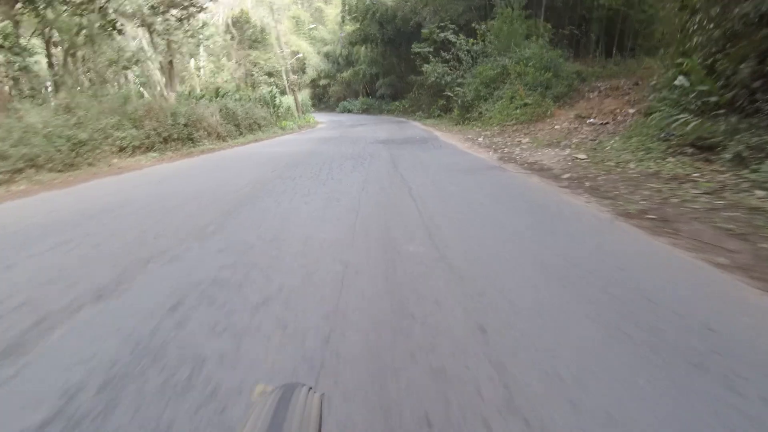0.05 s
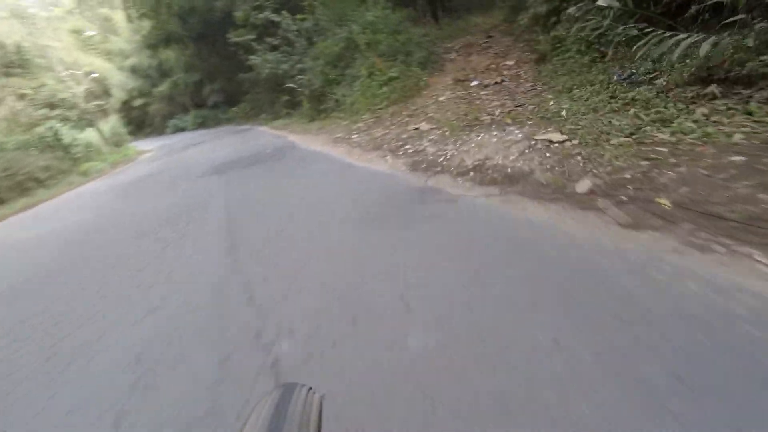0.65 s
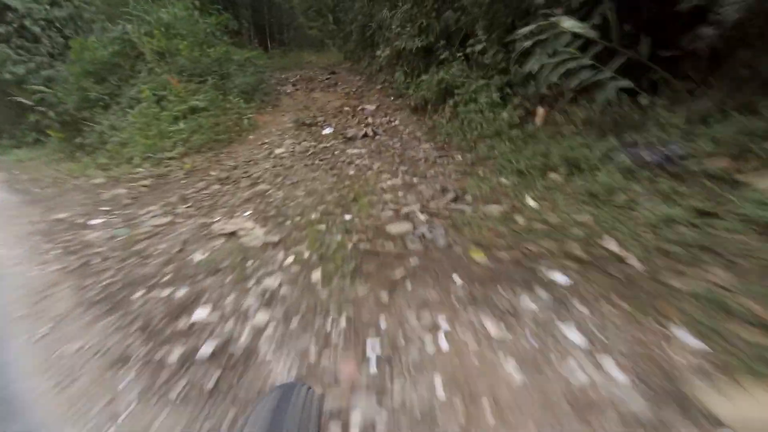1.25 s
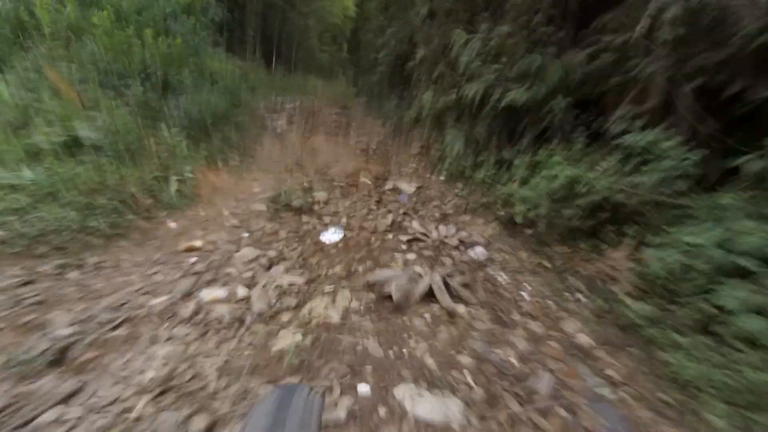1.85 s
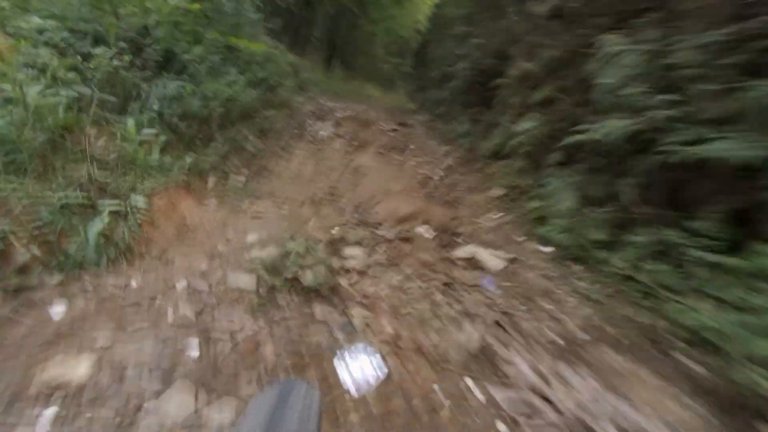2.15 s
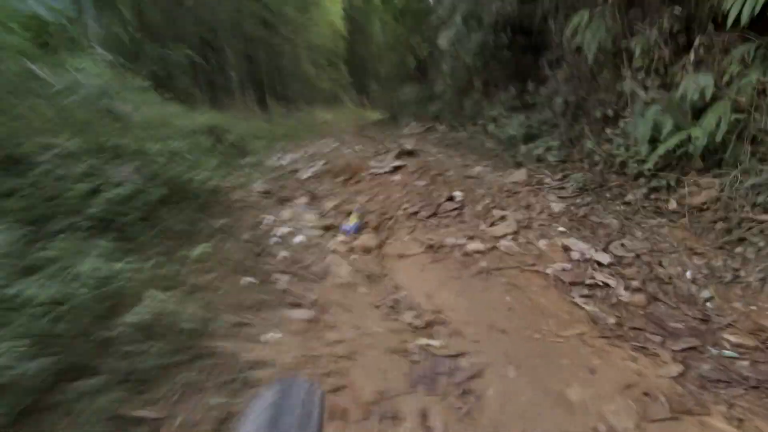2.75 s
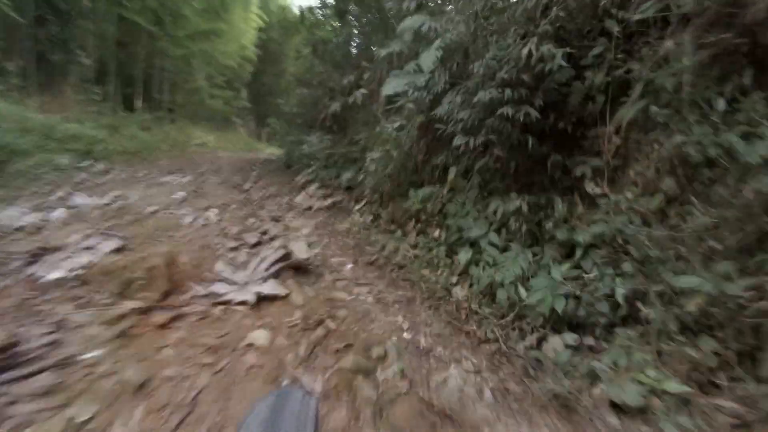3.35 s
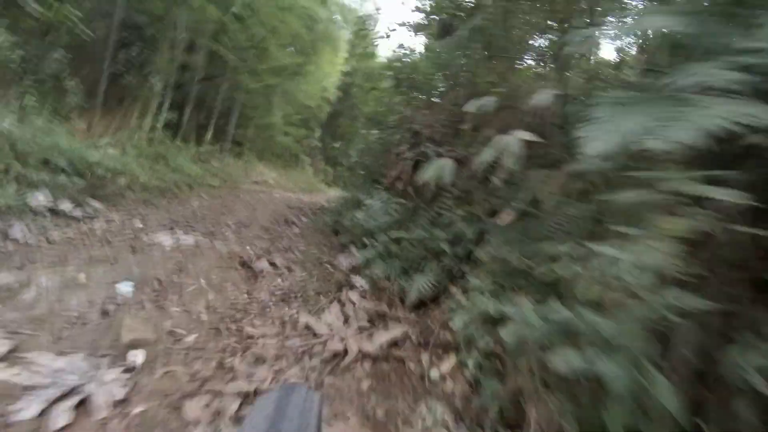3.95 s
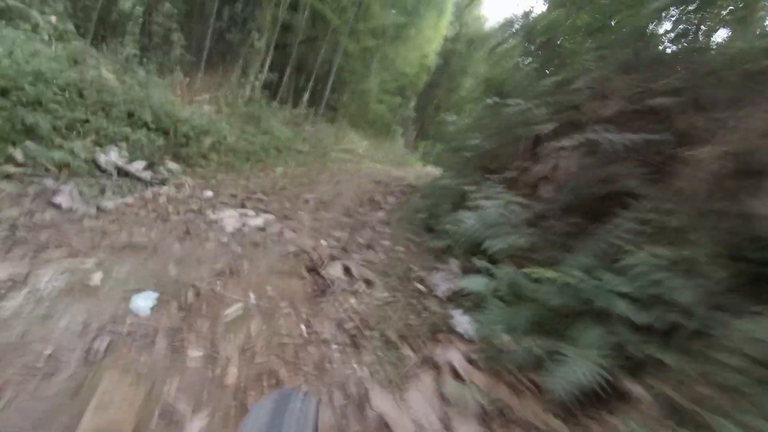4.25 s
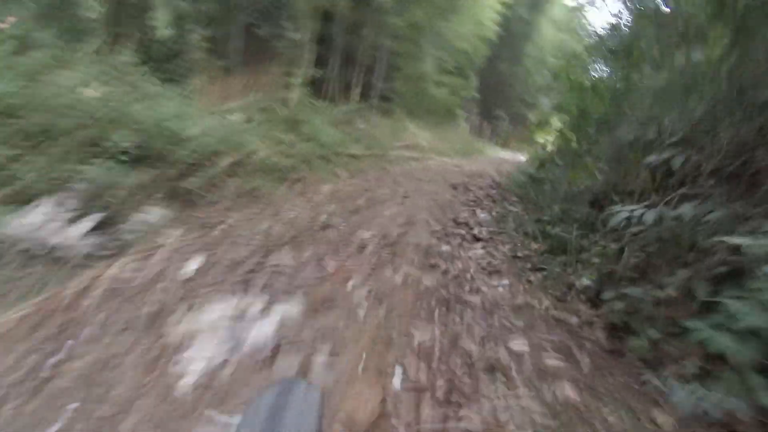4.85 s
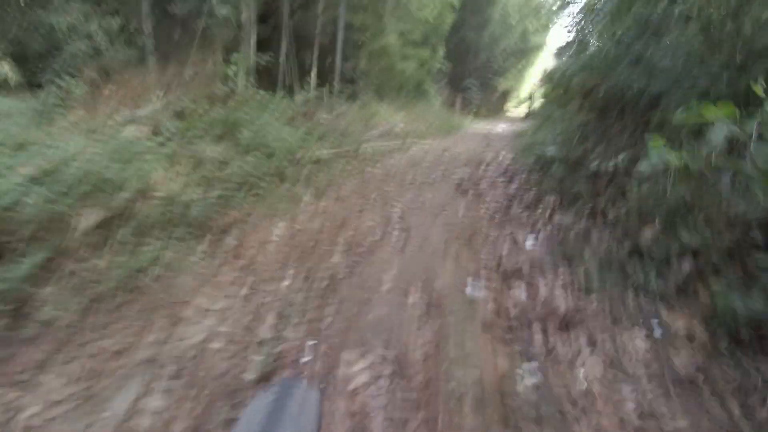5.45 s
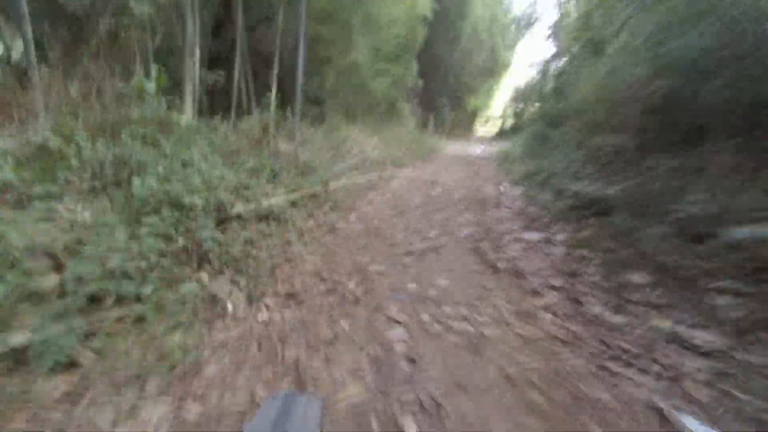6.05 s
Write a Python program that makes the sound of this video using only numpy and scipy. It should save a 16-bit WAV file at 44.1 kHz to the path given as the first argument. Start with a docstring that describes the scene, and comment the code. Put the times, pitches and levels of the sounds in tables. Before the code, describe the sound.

Close, dry rumble of a bicycle braking briefly, then rattling and knocking over rough ground with metallic clinks and low thuds.

```python
"""Mountain bike, from tarmac to stony trail.

The microphone rides in a camera fixed to the frame, so everything is close and dry. The bike brakes on
tarmac, then turns onto stones and leaves. The tyres shake the frame, stones knock the camera housing,
chain and cables clack against the tubes, brake pads and dry leaves hiss. The hardest jolts overload
the microphone, and now and then the running noise cuts out for an instant."""
import sys
import numpy as np
from scipy import signal
from scipy.fft import rfft, irfft, next_fast_len
from scipy.io import wavfile
from scipy.ndimage import uniform_filter1d

SR = 44100
rng = np.random.default_rng(int(sys.argv[2]) if len(sys.argv) > 2 else 0)


def put_to_file(sound):
    """Save the sound as 16-bit audio at rate SR, in the file named by the first command-line argument."""
    columns = np.atleast_2d(sound).T  # one column per channel
    safe = np.clip(columns, -1, 1)
    whole_steps = np.round(safe * 32767)
    wavfile.write(sys.argv[1], SR, whole_steps.astype(np.int16))


N = 272979
T = np.arange(N) / SR
DETUNE = 0.048  # each contact lands elsewhere on the metal and shifts its ring by up to about this share


def undb(db):
    """Decibels to gain."""
    return 10 ** (np.asarray(db) / 20)


def unit(x):
    """Scale to rms 1."""
    return x / np.sqrt(np.mean(x ** 2) + 1e-18)


def peak_at(sound, db, size):
    """Scale a hit so that its loudest stretch of `size` samples has the given amplitude."""
    return sound * undb(db) / np.sqrt(2 * uniform_filter1d(sound ** 2, size).max())


def add(out, s, sound):
    """Mix a sound in at time s."""
    i = int(np.clip(s * SR, 0, N - 1))
    out[i:i + len(sound)] += sound[:N - i]


def curve(table):
    """Rows (time [s], value) joined by straight lines."""
    return np.interp(T, *np.transpose(table))


def walk(per_s):
    """Random levels held 1 / per_s seconds and smoothed twice."""
    hold = max(int(SR / per_s), 1)
    steps = rng.standard_normal(N)[np.arange(N) // hold]
    return uniform_filter1d(uniform_filter1d(steps, hold), hold)


def grains(per_s, spread_db):
    """Random impulses of very unequal size."""
    occurs = rng.random(N) < per_s / SR
    size = np.minimum(rng.exponential(size=N), 3)
    return occurs * rng.choice([-1, 1], N) * undb(spread_db * size)


def colour(x, spectrum):
    """Filter by points (frequency [Hz], gain [dB]), rolling off below the first."""
    hz, db = np.transpose(spectrum)
    size = next_fast_len(len(x))
    f = np.maximum(np.arange(size // 2 + 1) * SR / size, 1)
    gain = undb(np.interp(np.log(f), np.log(hz), db)) / np.sqrt(1 + (hz[0] / f) ** 6)
    return irfft(rfft(x, size) * gain, size)[:len(x)]


def ringing(modes, size):
    """One row per mode: its damped swing after a tap; neighbours swing in opposite senses."""
    hz, width, db = np.transpose(modes)[:, :, None]
    t = np.arange(size) / SR
    sense = (-1) ** np.arange(len(hz))[:, None]
    return sense * undb(db) * width * np.exp(-np.pi * width * t) * np.sin(2 * np.pi * hz * t)


def around(modes, hz, octaves):
    """Weights that favour the modes near one frequency."""
    return np.exp(-(np.log2(np.transpose(modes)[0] / hz) / octaves) ** 2 / 2)


def shake(force, modes):
    """A body's answer to a running force, at rms 1."""
    return unit(signal.fftconvolve(force, ringing(modes, size=16384).sum(0))[:N])


def blow(modes, weights, contact_s, chatter, size):
    """A push followed by dying chatter of the contact rings the weighted modes."""
    t = np.arange(size) / SR
    contact = np.exp(-t / contact_s) * (1 - np.exp(-2 * t / contact_s)) / np.sqrt(contact_s * SR)
    force = chatter * rng.standard_normal(size) * contact
    force[0] += 1
    return signal.fftconvolve(force, weights @ ringing(modes, size))[:size]


def even(swing):
    """Stiff springs hold a swing near its usual size."""
    return swing / np.sqrt(uniform_filter1d(swing ** 2, size=4000) + 0.68)


# Modes of the fork, of the frame and mount under the microphone, and of the housing right around it:
# (frequency [Hz], width [Hz], gain [dB])
FORK_MODES = [(49, 9, 0)]
FRAME_MODES = [(103.36, 7.7, 8.5), (173.5, 13, -3.5), (186, 19.2, -4), (248.4, 22.8, 2), (334, 23, -20)]
HOUSING_MODES = [(344, 410, -15), (471.8, 45.7, -1), (517.4, 23.2, 1), (627, 62, 2.5), (772, 187, -3),
                 (926, 129, 1.5), (1086, 236, -4.5), (1176.7, 165, -5.5), (1827, 1570, -24)]
# Shaking by the ground: (time [s], relative frame rumble [dB], relative housing drone [dB])
SHAKING = [(0.04, -24, -18), (0.35, -27, -16), (1.36, -25.5, -18), (1.6, -29.5, -22.5), (2.03, -28, -17),
           (2.3, -27.5, -24.5), (2.64, -32, -15), (2.8, -40.5, -24), (3.29, -36, -29.5), (3.76, -29, -17.5),
           (4.27, -36.5, -25.5), (4.49, -28.5, -30), (4.66, -30.5, -26.5), (5.08, -34, -22.5),
           (5.37, -35.5, -26.5), (5.59, -31, -20), (5.73, -29.5, -24), (6.19, -25, -24)]


def tyres(rumble_db, drone_db, loose):
    """Tread and grit shake frame and housing; loose ground works the fork and coarsens the drone."""
    bounce = (0.21 + 0.59 * loose) * even(shake(rng.standard_normal(N), FORK_MODES))
    rumble = even(shake(rng.standard_normal(N), FRAME_MODES)) + bounce
    tread = colour(rng.standard_normal(N), [(300, 3.5), (650, 8), (800, -8.5), (1280, 1.5), (1600, -28)])
    grit = grains(per_s=260, spread_db=7.5)
    drone = np.sqrt(1 - loose) * shake(tread, HOUSING_MODES)
    drone += np.sqrt(loose) * shake(grit, HOUSING_MODES)
    return rumble * undb(rumble_db + 10.5) + drone * undb(drone_db - 2.03)


# Modes of the tubes and fittings beside the microphone: (frequency [Hz], width [Hz], gain [dB])
FITTING_MODES = [(1050, 340, -4.5), (1933, 87, -8.5), (2853, 470, -2.5), (3415, 720, -1), (3836, 210, 0.5),
                 (4560, 480, -6.5), (4970, 850, -6.5), (6070, 140, -13.5)]


def ground_crunch(drone_db, loose):
    """Gravel, twigs and leaves crunch in clusters and the tyres crackle, harder as the bike shakes."""
    decay = np.exp(-np.arange(512) / SR / 0.00074)
    clusters = undb(np.clip(walk(per_s=22.33), -2, 1))

    def scrapes(per_s):
        """Short bursts of noise at random moments."""
        taps = np.abs(grains(per_s, spread_db=9)) * clusters
        return signal.fftconvolve(taps, decay)[:N] * rng.standard_normal(N)

    gravel = scrapes(per_s=140 * loose)
    stones = undb(-5) * shake(gravel, HOUSING_MODES) + undb(-17) * shake(gravel, FITTING_MODES)
    leaves = undb(-21.5) * unit(colour(scrapes(per_s=45 * loose), [(4000, 1), (15000, 0)]))
    crackle_spectrum = [(1250, 4), (2400, -1), (3700, 21), (6300, -26), (8000, -10)]
    crackle = unit(colour(scrapes(per_s=130 * loose), crackle_spectrum))
    crackle_db = drone_db - drone_db.mean() - 39.5
    return (stones + leaves) * loose * undb(drone_db) + crackle * loose ** 2 * undb(crackle_db)


# Rubbing of the pads, down at the hub: (frequency [Hz], gain [dB])
PAD_SPECTRUM = [(1300, -2), (2600, -4), (4200, -11), (6000, -15), (8000, -11.5), (10000, -9), (15000, -9.5)]
# Modes of the brake disc: (frequency [Hz], width [Hz], gain [dB])
DISC_MODES = [(2970, 200, 8), (3830, 250, 3), (4570, 130, 3), (5480, 140, -8), (7020, 250, -10),
              (9120, 300, -4), (9680, 170, -2), (10300, 500, -9), (11050, 500, -6), (12400, 300, -3),
              (13800, 600, -7)]
# Pressure on the brake, heard as the hiss of its pads: (time [s], relative level [dB])
BRAKE_LEVELS = [(0.05, -52), (0.4, -46), (0.6, -37), (0.93, -42.5), (1.35, -37), (1.5, -49), (2.4, -48),
                (2.8, -68.5), (5.78, -59), (5.9, -54), (6.19, -61)]


def brake():
    """The pads graze in pulses, then grip and ring the disc; on the trail they keep dragging lightly."""
    f = np.arange(N // 2 + 1) * SR / N
    resonance = sum(undb(db) / (1 + ((f - hz) / (0.72 * width)) ** 2) for hz, width, db in DISC_MODES)
    rubbing = colour(rng.standard_normal(N), PAD_SPECTRUM)
    disc = irfft(rfft(rng.standard_normal(N)) * resonance, N)
    pads = unit(rubbing + 1.2 * disc)
    pads *= undb(1.3 * walk(per_s=69.85))  # the pads catch unevenly
    grazing = np.clip((0.7 - T) / 0.5, 0, 1)
    pads *= undb(4.7 * grazing * np.sin(2 * np.pi * 29 * T))
    # A light touch rings only the lowest modes.
    singing = grazing * shake(rng.standard_normal(N), DISC_MODES[:3]) * undb(-43.5)
    return singing + pads * undb(curve(BRAKE_LEVELS) + 6)


def clack(db, crack_db, tap_db):
    """Chain or cable rings the fittings and taps the housing; a hard contact adds a broad crack."""
    t = np.arange(2048) / SR
    weights = undb(2 * rng.standard_normal(len(FITTING_MODES)))
    tubes = np.array(FITTING_MODES)
    tubes[:, 0] *= 1 + DETUNE * rng.uniform(-1.11, 1, len(tubes))
    ring = blow(tubes, weights, contact_s=0.0017, chatter=1.5, size=len(t)) * (1 - np.exp(-t / 0.0012))
    tap_weights = around(HOUSING_MODES, hz=1486, octaves=0.16)
    tap = blow(HOUSING_MODES, tap_weights, contact_s=0.0011, chatter=2.66, size=len(t))
    crack = colour(rng.standard_normal(len(t)), [(4000, 8.3), (12000, 7.7), (15500, 2.5)])
    crack *= (1 - np.exp(-t / 0.0001)) * np.exp(-t / 0.0028)
    return (peak_at(ring, db - 1, size=60)
            + peak_at(tap, db + tap_db + 0.5, size=120)
            + peak_at(crack, db + crack_db, size=120))


# Chain and cables hitting the frame, within arm's reach of the microphone:
# (time [s], level [dB], sharp crack offset [dB], hollow tap offset [dB])
FRAME_CLACKS = [(0.1984, -12, -19, 3.5), (0.3691, -15, -32, 4), (0.606, -17.5, -30, 8.5),
                (0.7631, -12.5, -29, 4), (0.7852, -13.5, -25, -1), (1.2475, -14, -30, 2.5),
                (1.4218, -6, -6, -34), (1.4349, 3.5, -11, -33), (1.587, -11, -8, -12),
                (1.609, -9.5, -8, -6), (1.6398, -18.5, 4, 2), (1.8006, -5, -14, -2.5),
                (1.8177, -4, -1, -17), (1.841, -2, -22, -9), (2.282, -19, -25, 8.5), (2.3136, -2, -11, 0.5),
                (2.732, -9.5, -33, -8), (3.135, -10.5, -5, 0), (3.253, -10.5, -11.5, -3.5),
                (3.497, -10, -25, -14), (3.5178, -2.5, -13.5, -4), (3.5819, -13, -2.5, 1.5),
                (3.7622, -4.5, -3, -20), (3.818, -5.5, -7, -23), (3.858, -11, -10, -3),
                (3.8771, -10.5, -9, -2), (3.907, -13, -1, -10), (3.9516, -13, -2, -26),
                (4.043, -14.5, -12, -9), (4.076, -21.5, -35, 11), (4.2048, -7, -29, 4),
                (4.681, -19.5, -16, 8.5), (4.9855, -12, -1.5, -8), (5.3192, -8.5, -1.5, -33),
                (5.409, -0.5, -9, -34), (5.578, -8, -7, -2), (5.586, -7, -5, -12),
                (5.7043, -13.5, -0.5, -16), (6.137, -14, -8.5, -34)]


def clacks():
    """The chain and cables swing against the tubes on their own, and bounce once."""
    out = np.zeros(N)
    for s, db, crack_db, tap_db in FRAME_CLACKS:
        add(out, s, clack(db, crack_db, tap_db))
        bounce_s = 0.014 * (0.5 + rng.random())
        add(out, s + bounce_s, clack(db - 14.5, crack_db, tap_db))
    return out


# A cable pinging on a nearby tube, and the chain chinking on its sprockets further off:
# (time [s], relative level [dB])
CABLE_PINGS = [(0.447, -20), (0.5084, -14.5), (0.526, -21), (0.5821, -16), (0.632, -15.5), (0.6684, -11.5),
               (1.2188, -13.5), (2.0166, -7.5), (2.1149, -14), (2.5467, -2.5), (2.656, 0.5), (2.7113, -12),
               (2.988, -2), (3.0736, -7.5), (3.111, -13), (4.753, -7), (4.8755, -10), (4.933, -12),
               (5.347, -18), (5.421, -13), (5.92, -7), (6.0245, -6)]
CHAIN_CHINKS = [(1.488, -18), (1.6396, -8), (1.8002, -8), (1.8405, -10), (2.077, -16), (2.313, 2.5),
                (3.3966, -12.5), (4.4641, -1.5), (4.5734, -3), (4.8433, -16), (4.9011, -11.5),
                (5.2935, -9.5)]
# Modes of that tube and of the sprockets: (frequency [Hz], width [Hz], gain [dB])
TUBE_MODES = [(2860, 190, -1), (3420, 300, -2), (3830, 180, 4)]
SPROCKET_MODES = [(1780, 180, -1), (3600, 700, -5), (5500, 400, -3), (6050, 320, 2)]


def metal_chimes(hits, modes):
    """A glancing contact gives a dry tick and rings a metal part, a little differently each time."""
    out = np.zeros(N)
    attack = 1 - np.exp(-np.arange(2048) / SR / 0.001)
    for s, db in hits:
        part = np.array(modes, float)
        part[:, 0] *= 1 + DETUNE * rng.uniform(-1.13, 1, len(part))
        weights = undb(2 * rng.standard_normal(len(part)))
        ring = blow(part, weights, contact_s=0.0016, chatter=0.9, size=len(attack))
        add(out, s, peak_at(ring * attack, db - 2, size=60))
        add(out, s, clack(db - 5, crack_db=-22, tap_db=-2))
    return out


# Dirt and dry leaves, a wheel's height below the microphone: (frequency [Hz], gain [dB])
LITTER_SPECTRUM = [(1400, -2), (2400, 17), (3700, 16.5), (6000, 10.5), (8000, 11.5), (12000, 10),
                   (15000, -10)]
# Their hiss along the trail: (time [s], relative level [dB])
LITTER_LEVELS = [(1.55, -57), (2.35, -47), (2.55, -44.5), (2.8, -63), (3.3, -56.5), (3.58, -48),
                 (3.9, -53.5), (4.16, -66), (4.23, -45.5), (4.36, -48), (4.45, -43.5), (4.68, -65),
                 (4.83, -50.5), (5.1, -65), (5.5, -60), (6.19, -48)]


def leaf_litter(on_trail):
    """Dirt and dry leaves give a gritty, flickering hiss under the tyres."""
    gritty_noise = rng.standard_normal(N) + 0.58 * unit(grains(per_s=630, spread_db=12))
    hiss = unit(colour(gritty_noise, LITTER_SPECTRUM))
    return hiss * on_trail * undb(curve(LITTER_LEVELS) + 4 * walk(per_s=45) + 8)


def knock(db, centre_hz=785):
    """The housing chatters in its mount, buzzes the fittings, thumps the frame and rattles to rest."""
    t = np.arange(4096) / SR
    # Pressed hard, the housing rings shorter.
    pressed = [(hz, 1.18 * width, mode_db) for hz, width, mode_db in HOUSING_MODES]
    weights = around(pressed, centre_hz, octaves=0.5) + 0.3
    weights *= undb(2.5 * rng.standard_normal(len(pressed)))
    body = blow(pressed, weights, contact_s=0.0038, chatter=2.3, size=len(t))
    buzz_weights = around(FITTING_MODES, 2 * centre_hz, octaves=0.68)
    buzz = blow(FITTING_MODES, buzz_weights, contact_s=0.0062, chatter=0.77, size=len(t))
    thump = colour(rng.standard_normal(len(t)), [(170, -5), (420, -13), (3000, -77)])
    thump *= np.exp(-t / 0.014)
    ticks = (rng.random(len(t)) < 650 / SR) * rng.standard_normal(len(t))  # about 650 a second
    ticks *= t * np.exp(-t / 0.01)
    settle = signal.fftconvolve(ticks, weights @ ringing(pressed, size=len(t)))[:len(t)]
    attack = 1 - np.exp(-t / 0.0027)  # the tyre softens each blow
    parts = (body, 0), (buzz, -20.5), (thump, -18), (settle, -15.5)
    return sum(peak_at(part * attack, db + part_db, size=170) for part, part_db in parts)


# Stones jolting the housing, right at the microphone:
# (time [s], knock level [dB], strikes [count], relative chain level [dB])
STONE_JOLTS = [(1.381, -1.5, 1, -13), (1.789, -6, 2, -39), (1.949, -13, 1, -20), (2.067, -10, 1, -41),
               (2.296, -4, 2, -18), (2.471, -3, 3, -8), (2.533, -12, 2, -8.5), (2.619, 7.5, 1, -1),
               (2.627, -1, 1, -2.5), (2.648, 1, 2, -7), (2.749, -8, 1, -39), (2.769, -0.5, 2, -8),
               (2.958, -2.5, 3, -8.5), (3.041, -11.5, 1, -23), (3.074, -12, 1, -17), (3.112, -12, 1, -20),
               (3.407, -8, 1, -21), (3.472, -12.5, 2, -20), (3.701, -4, 1, -23), (3.731, -2, 1, -41),
               (4.2018, -6, 1, -25), (4.458, 4.5, 1, -2.5), (4.468, 9, 1, 1.5), (4.501, -4, 2, -14.5),
               (4.557, -9, 1, -24), (4.571, -1, 1, -6), (4.623, -6, 1, -7), (4.752, -7, 1, -12),
               (4.816, -9.5, 1, -15.5), (4.839, -6.5, 1, -18), (4.854, 0.5, 1, -33), (4.867, -1.5, 1, -33),
               (4.919, -6, 2, -18.5), (5.094, -1, 1, -25), (5.168, 6, 1, 6.5), (5.211, -4.5, 1, -11.5),
               (5.613, -7, 1, -32), (5.859, -17, 1, -26), (5.944, -7.5, 1, -14), (5.977, -5, 1, -18.5),
               (6.117, -4, 1, -23)]


def stone_jolts(rebound_s=0.019, chain_lag_s=0.001452, tumble_s=0.028):
    """Stones throw the housing against its mount, where it rebounds; the chain slaps at each strike."""
    out = np.zeros(N)
    for s, db, strikes, chain_db in STONE_JOLTS:
        for strike in range(round(strikes)):
            at = s + strike * rebound_s
            add(out, at, knock(db))
            add(out, at + chain_lag_s, clack(chain_db + 1.5, crack_db=-8.5, tap_db=-2))
            for late in rng.random(size=4):  # links tumble after, the later the softer
                link = clack(chain_db - 12.5, crack_db=-14, tap_db=1)
                add(out, at + late * tumble_s, (1 - late / 2) * link)
    return out


# Wheels dropping into ruts, heard up through the frame: (time [s], level [dB], centre [Hz])
RUTS = [(1.406, -5.5, 174), (1.803, -9.5, 236), (1.943, -5, 211), (2.261, -10.5, 44.6), (2.484, -5, 232),
        (2.512, -10.5, 55.5), (2.621, -5.5, 191), (3.705, -5.5, 126), (3.874, -7, 109), (4.251, -7.5, 93),
        (4.479, 0.5, 77.5), (5.175, -8.5, 137), (5.561, -9, 167), (5.973, -6.5, 71)]


def rut_thuds():
    """Deep ruts set the fork and frame swinging in a low thud."""
    out = np.zeros(N)
    modes = [(hz, 0.99 * width, db) for hz, width, db in FORK_MODES + FRAME_MODES]
    for s, db, hz in RUTS:
        swing = blow(modes, around(modes, hz, octaves=0.61), contact_s=0.007, chatter=3.8, size=8192)
        add(out, s, peak_at(swing, db, size=600))
    return out


# Brief gaps in the running noise: (time [s], length [s])
GAPS = [(2.453, 0.011), (2.941, 0.008), (3.207, 0.0246), (3.678, 0.019), (4.165, 0.031), (4.35, 0.027),
        (5.466, 0.022), (5.804, 0.03), (5.926, 0.022), (6.078, 0.03)]


def dropouts(depth_db=-14, fall_s=0.00046, return_s=0.0022):
    """Gain of the running noise: it drops abruptly and comes back over a few milliseconds."""
    cut = np.zeros(N)
    for s, length in GAPS:
        cut += np.clip((T - s) / fall_s, 0, 1) * np.clip((s + length - T) / return_s + 0.5, 0, 1)
    return undb(depth_db * cut)


# Pitched knocks and clinks close to the microphone: (time [s], level [dB], pitch [Hz])
PITCHED_HITS = [(3.113, -18, 1600), (3.142, -14.5, 1400), (5.096, 8, 753), (5.296, -9, 1180)]


def pitched_hits(width_hz=60):
    """Knocks and clinks that ring briefly on one note."""
    out = np.zeros(N)
    for s, db, hz in PITCHED_HITS:
        ring = blow([(hz, width_hz, 0)], np.ones(1), contact_s=0.0031, chatter=1.33, size=4096)
        add(out, s, peak_at(ring, db, size=170))
    return out


def scene():
    """Everything reaches the one microphone through the frame, with no room around it."""
    start_s, tarmac_end_s, verge_crossing_s = 0.03, 1.302, 0.17
    rumble_db, drone_db = (curve(np.array(SHAKING)[:, [0, column]]) for column in (1, 2))
    on_trail = np.clip((T - tarmac_end_s) / verge_crossing_s + 0.5, 0, 1)
    loose = np.interp(on_trail, [0, 1], [0.14, 0.78])  # looseness of the ground, tarmac to trail
    running = tyres(rumble_db, drone_db, loose) + ground_crunch(drone_db, loose)
    running += brake() + leaf_litter(on_trail)
    hits = rut_thuds() + stone_jolts() + clacks() + pitched_hits()
    hits += metal_chimes(CABLE_PINGS, TUBE_MODES) + metal_chimes(CHAIN_CHINKS, SPROCKET_MODES)
    return ((running * dropouts() + hits) * (T > start_s))[None]


def record(dry, low_hz=35, top_hz=15300):
    """The microphone drops the deepest bass, the input clips at full scale and the top is cut."""
    heard = signal.sosfilt(signal.butter(6, low_hz, "high", fs=SR, output="sos"), dry)
    clipped = np.clip(heard, -1, 1)
    return signal.sosfilt(signal.ellip(10, 0.2, 75, top_hz, fs=SR, output="sos"), clipped)


dry = scene()
out = record(dry)
put_to_file(out)
```